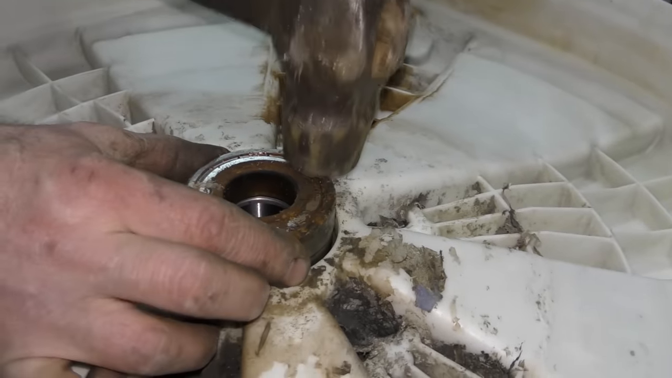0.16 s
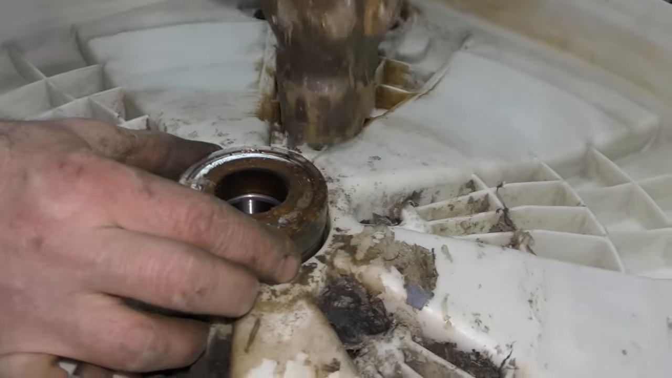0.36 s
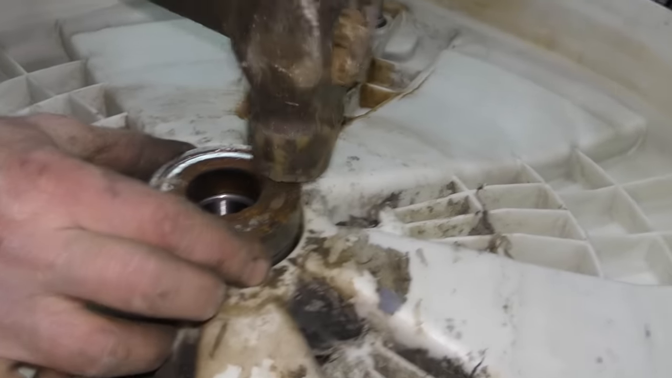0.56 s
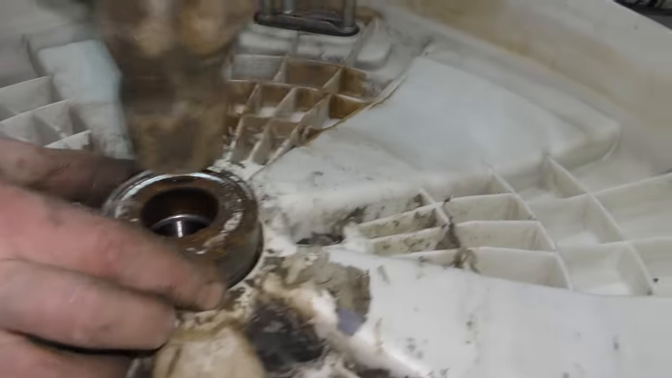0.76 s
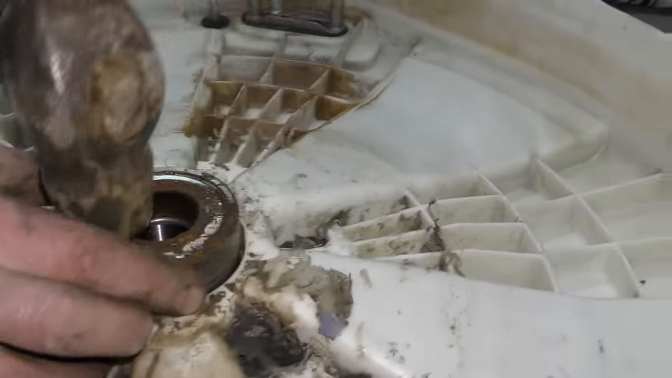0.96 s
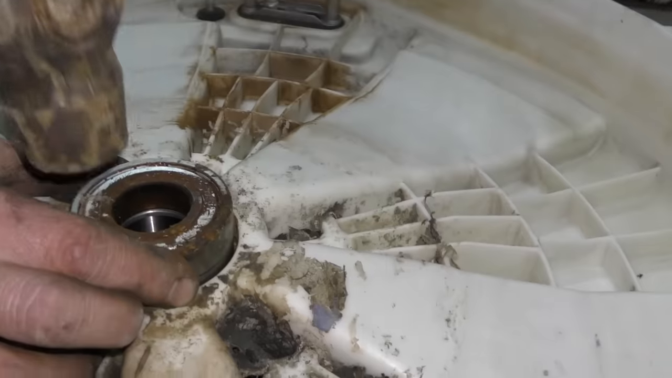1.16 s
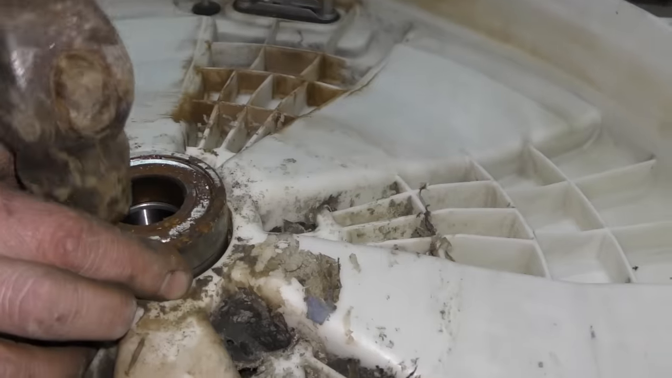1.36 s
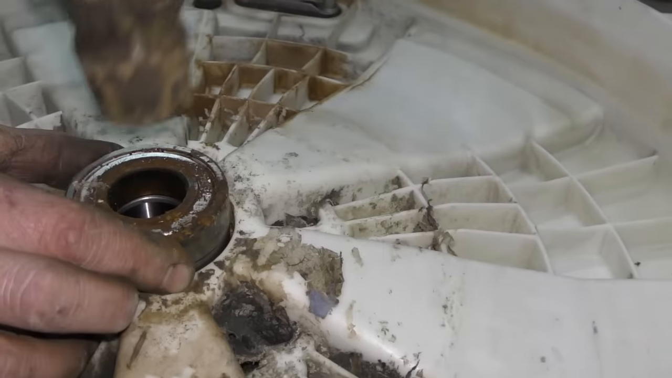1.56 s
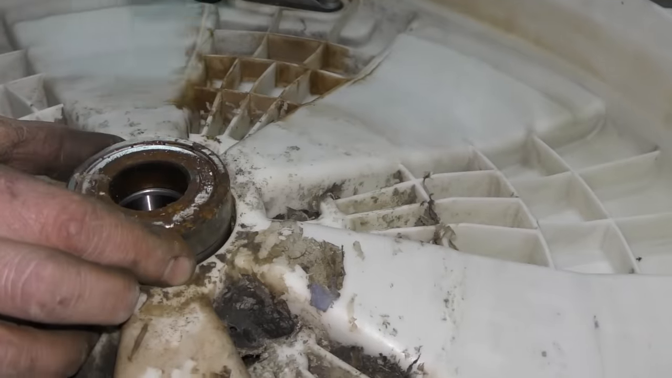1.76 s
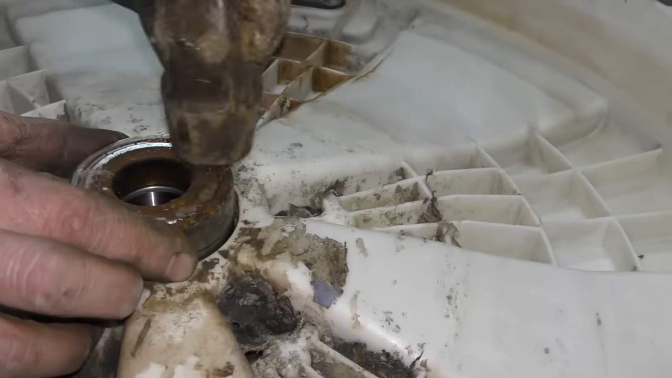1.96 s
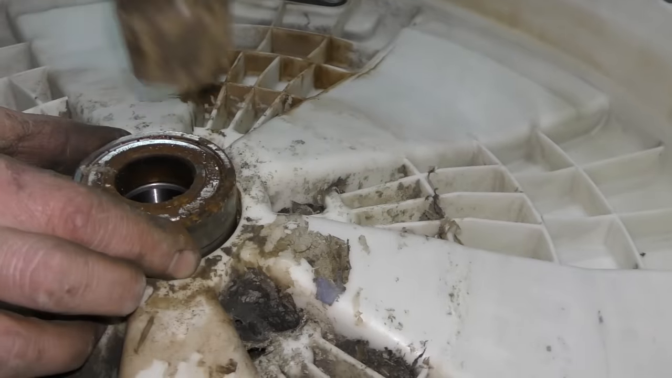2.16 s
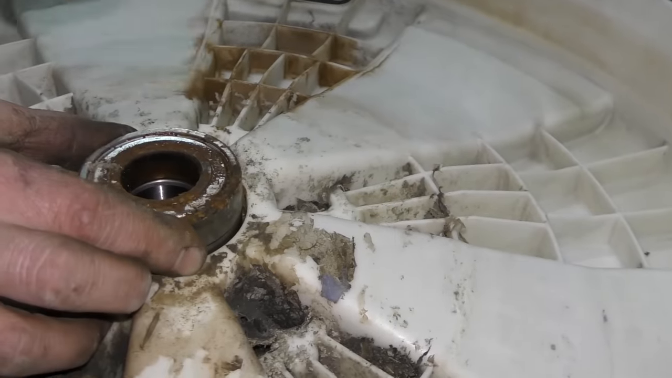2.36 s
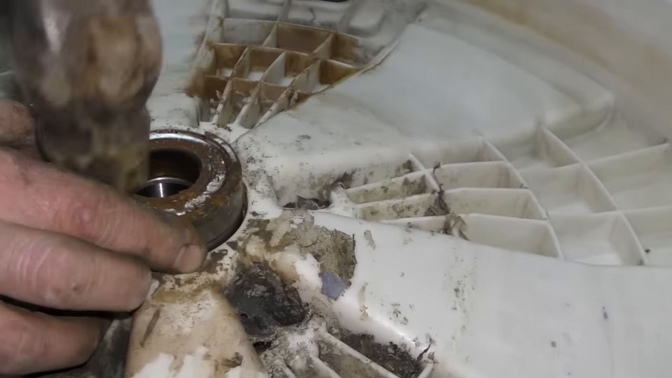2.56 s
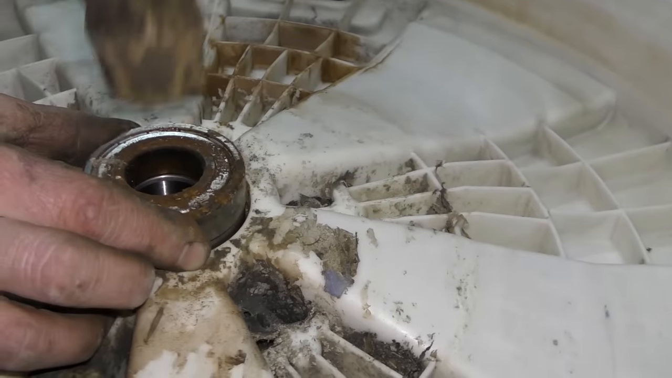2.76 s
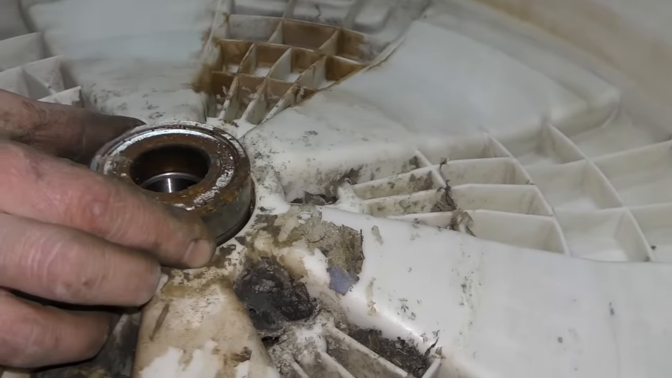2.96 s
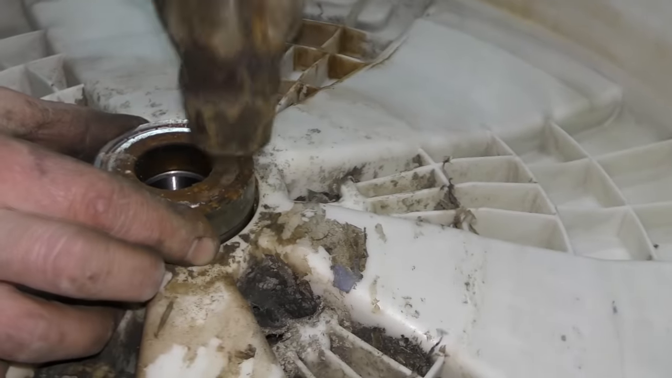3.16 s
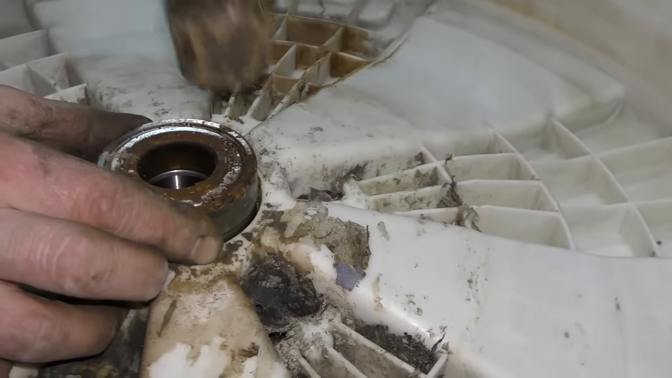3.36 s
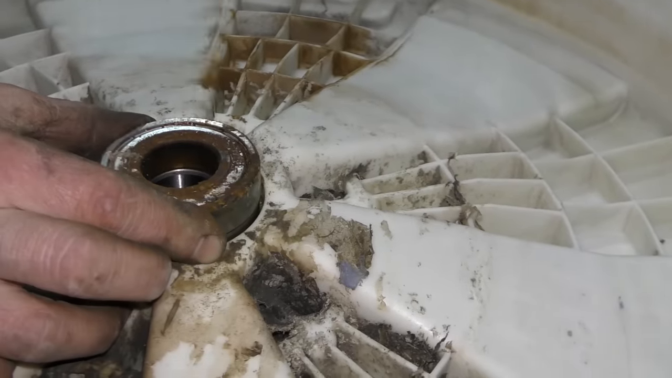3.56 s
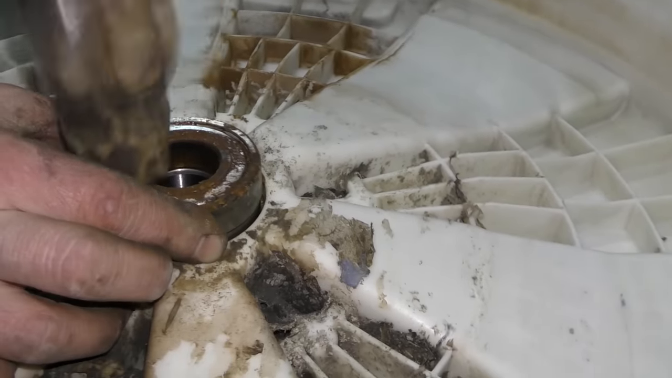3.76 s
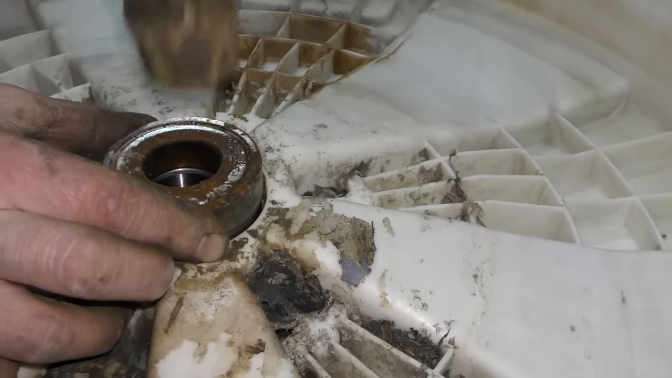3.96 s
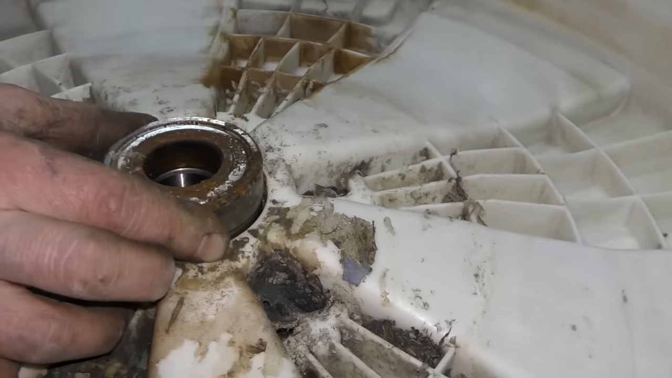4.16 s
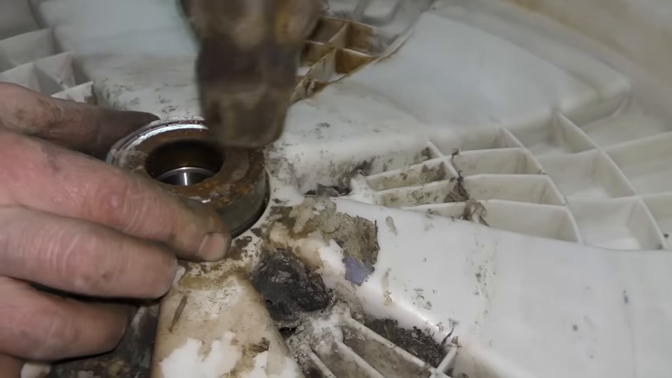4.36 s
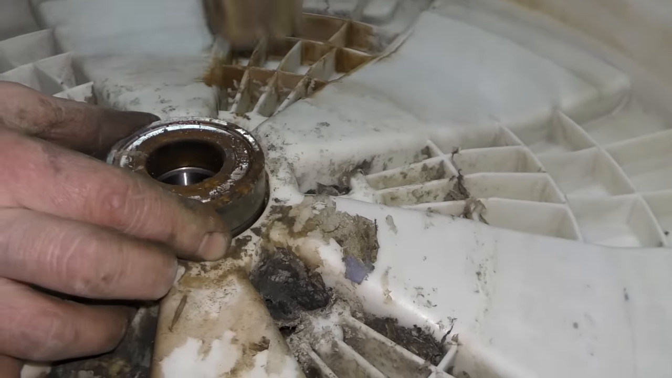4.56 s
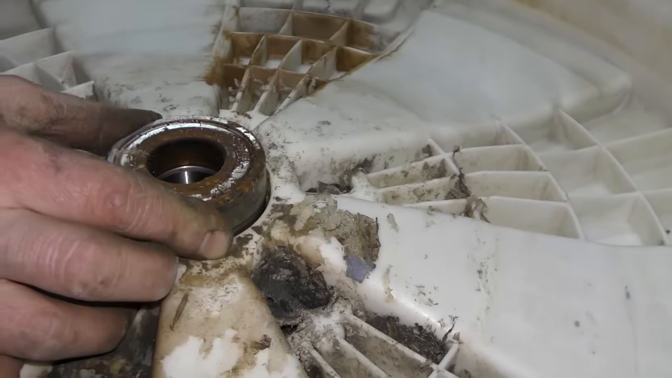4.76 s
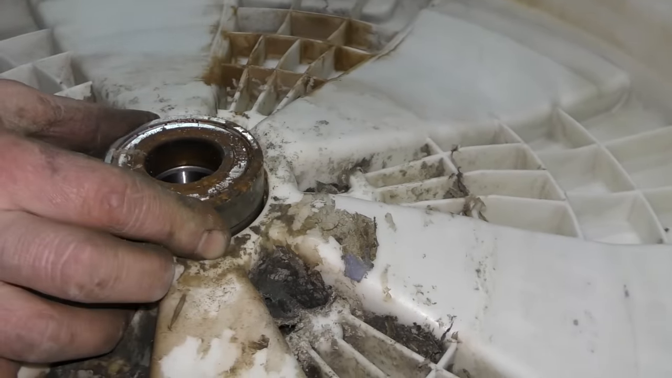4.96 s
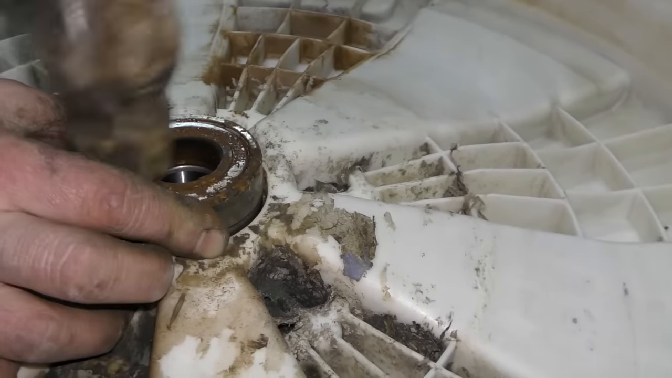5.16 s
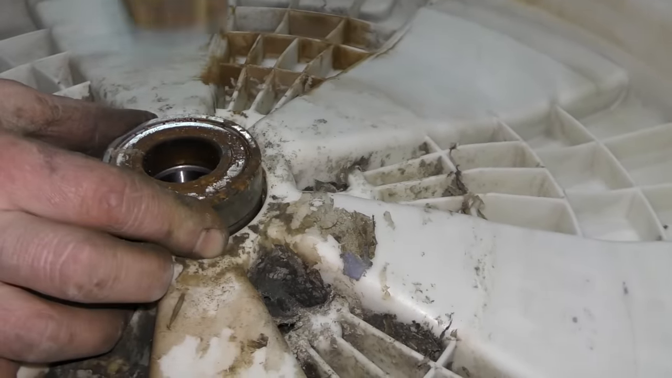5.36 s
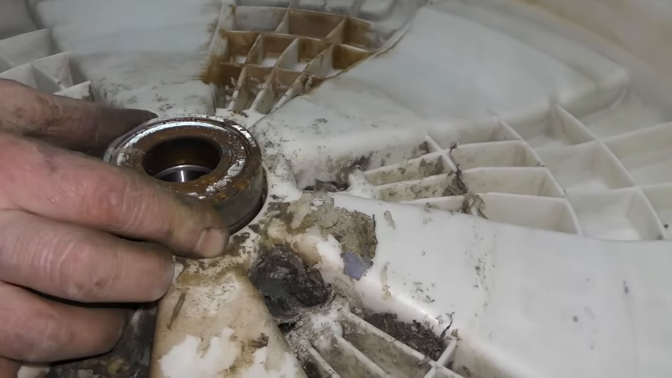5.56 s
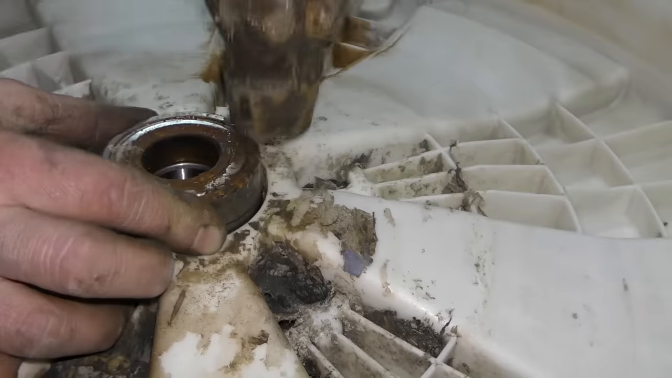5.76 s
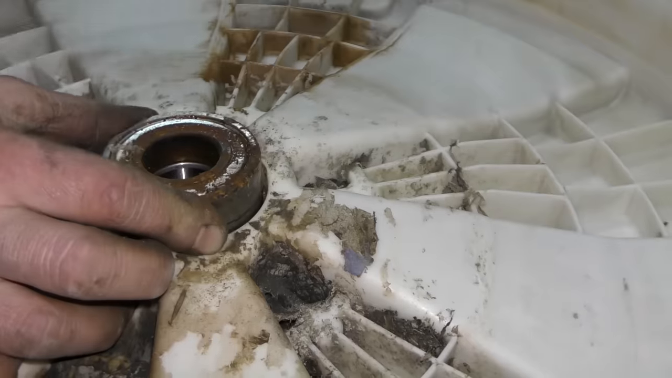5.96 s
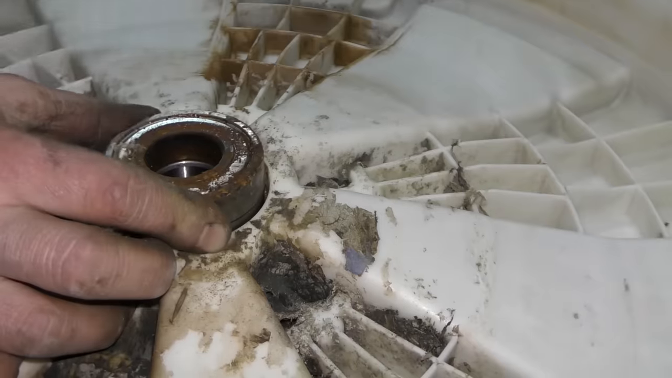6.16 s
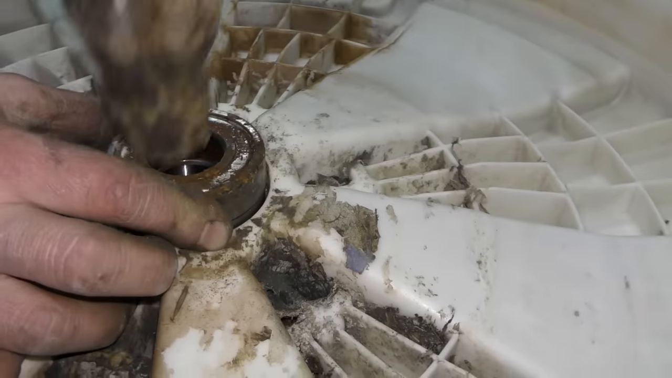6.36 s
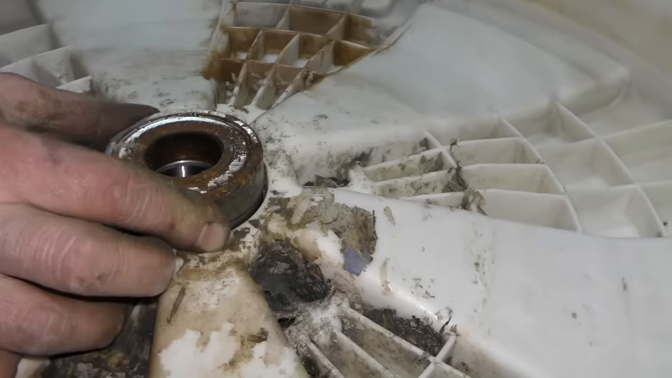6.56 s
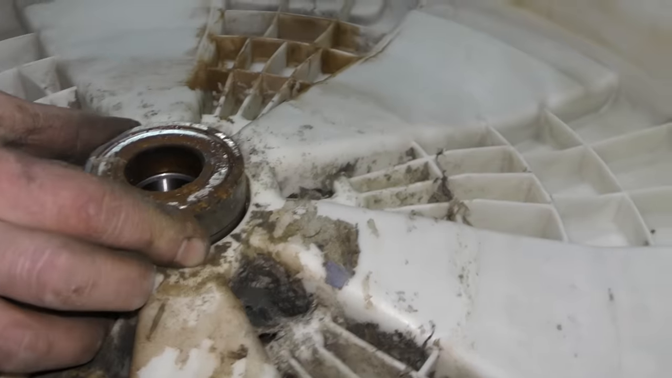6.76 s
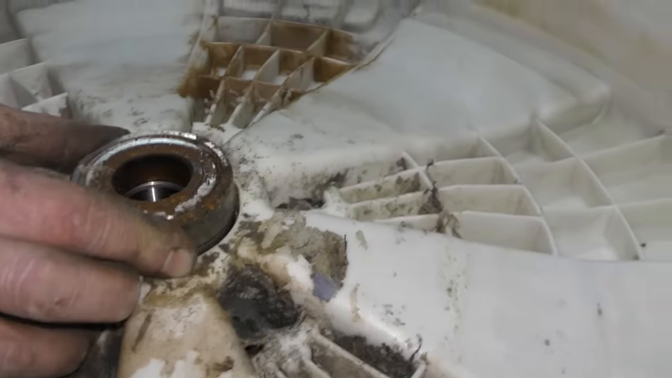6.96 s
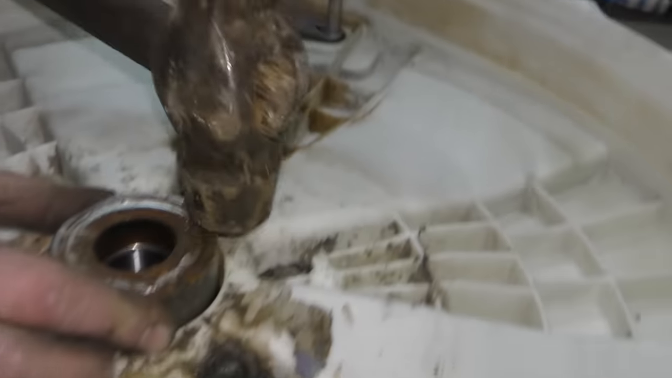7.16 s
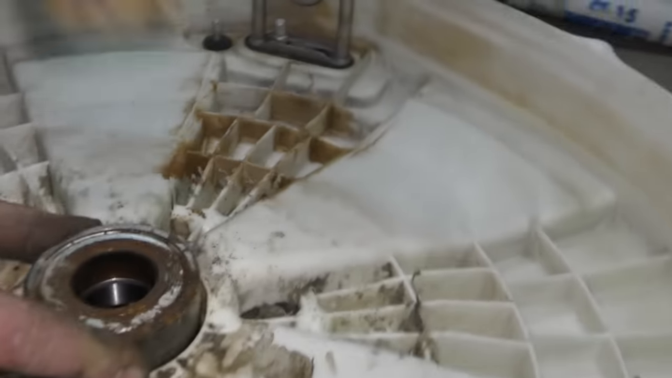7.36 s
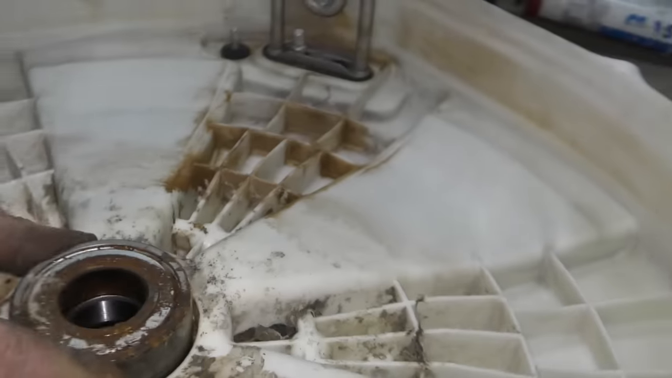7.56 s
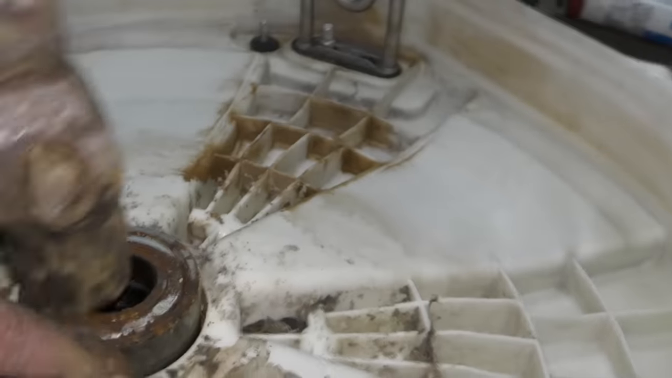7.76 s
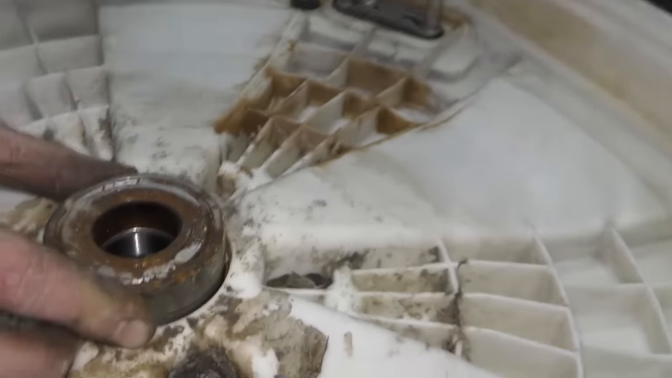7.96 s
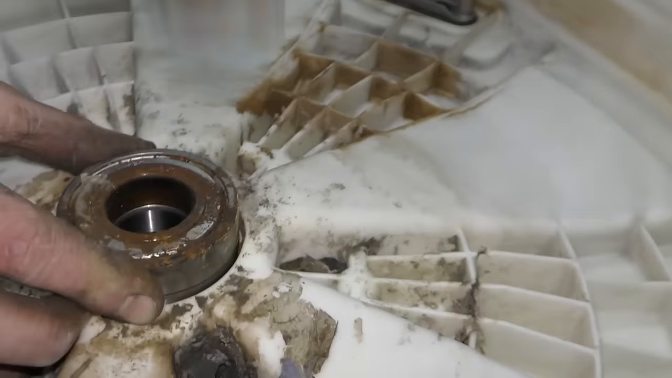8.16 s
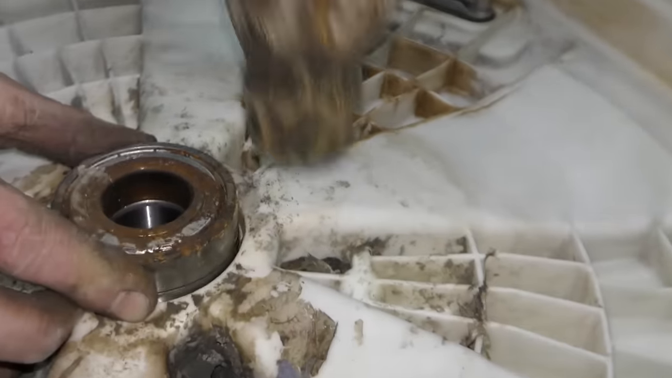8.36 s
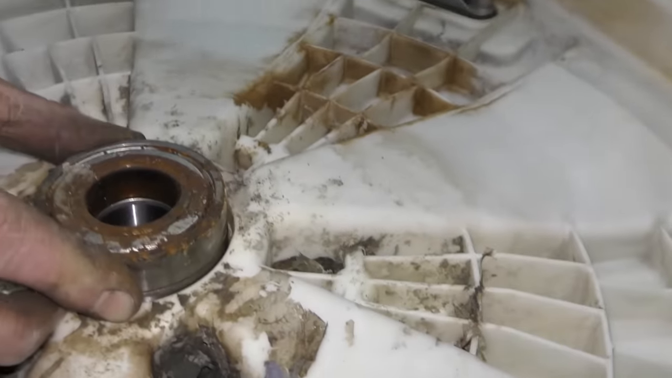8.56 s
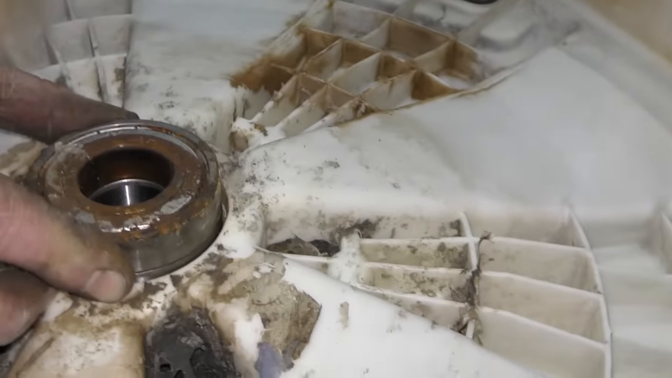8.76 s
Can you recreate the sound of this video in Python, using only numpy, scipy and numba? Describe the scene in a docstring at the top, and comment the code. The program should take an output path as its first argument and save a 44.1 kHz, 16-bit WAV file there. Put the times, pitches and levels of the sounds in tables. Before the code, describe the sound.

A phone close to the work in an echoing workshop picks up a steel hammer driving a bearing into a plastic washer tub. A faint tail of an earlier sound fades at the start. A soft, boomy tap falls at 0.2 seconds, a sharper one at 0.5, then a pause. Firmer blows follow at 1.3, 1.9, 2.6, 3.2, 3.8 and 4.4, then 5.2, 5.7, 6.3, 7.1, 7.7 and 8.2, growing to full strength. Each is a bright double click with gritty rattle, a short hollow tub knock and hub ring, a faint long drum hum and about half a second of echo with a slap from a far wall. Gain ducks, then creeps back, holding up the echo. A distant scuff with trailing hiss comes at 2.3. Fingers tick and slide around 7.0, 7.6 and 8.1. Low hum, muffled room noise and thin hiss continue until about 9.

```python
"""Hammering a bearing into a tub

A steel hammer taps a bearing into the hub of a plastic washer tub, close to a phone in a workshop. Each blow is
clicks and rattle, fading tones of the tub, a long drum hum and room echo. Gain control ducks at the blow and creeps
back, holding the echo up for a moment. Fingers tick and slide, something scuffs farther off with a trailing hiss,
the tail of something earlier fades at the start, and under it all lie a low hum, filtered room noise and
microphone hiss."""
import sys
import numpy as np
from scipy import signal
from scipy.fft import rfft, irfft
from scipy.io import wavfile
from scipy.ndimage import uniform_filter1d
from numba import njit

SR = 44100
rng = np.random.default_rng(int(sys.argv[2]) if len(sys.argv) > 2 else 0)


def waveform_to_disk(signal):
    """Save audio, clipped to [-1, 1], as 16-bit WAV at the path in sys.argv[1]."""
    frames = np.transpose(np.atleast_2d(signal))
    scaled = np.clip(frames, -1, 1) * 32767
    samples = np.round(scaled).astype(np.int16)
    wavfile.write(sys.argv[1], SR, samples)


N = 388521  # length in samples

# Half a step to the left port and half a step back to the right one.
PORTS = np.array(np.array([[.5], [-.5]]))

# The hammer blows. Each row: start in seconds, strength in dB, then levels in dB against the strength of: the crack,
# the tub's thud, its boom, its rim, its ribs, three hub rings from low to high, three bearing rings from low to high,
# the crack sent to the walls; then treble tilt in dB per octave, delay of the second click in milliseconds,
# second click in dB against the first, chatter in dB.
BLOWS = [(0.1986, -11.5, -0.5, -3, 13, 8.5, -16, -3.5, -1.5, 5.5, -6, -6, -20, 4, -10.5, 0.51, 1.5, -15.5),
         (0.5073, -0.5, -13, -9, 7.5, 1, -24, -3.5, -23, -20, -8, -4, 11, -1, -0.5, 0.92, 11, -1.5),
         (1.3032, 3.5, 0.5, -2, 4.5, -2.5, -1.5, -7, -2.5, -26, -11, -9, -12, -3, -6, 0.93, -19, -16),
         (1.9421, 3.5, 2.5, -1, 10.5, -6, -4, -2, 2, 5.5, -4, 1.5, 8, 7, -3, 0.86, -31, -8),
         (2.5782, 6, -8.5, 0, 5, -1, -7, -6.5, -2, -20, -8, 0, 6, -3.5, 0, 0.8, -7, 1.5),
         (3.1795, 7.5, 3, -4, 2, 1, -22, -6, -6, 1, -10, -1.5, -11, -0.5, -1, 0.94, 3, -9),
         (3.7832, 8.5, -1.5, -4, 1.5, -2, -1, -5.5, -9, 3, -6, -2.5, 4, -3.5, -2, 0.76, -1, -5),
         (4.3752, 10.5, -4, -2, 1, 1.5, 1, -8, -6.5, 1.5, -2.5, -3, -17, -5, 0, 0.66, -1, -6.5),
         (5.1719, 9, 0, 1, 4.5, 0.5, 4, 2.5, -0.5, 6, 3, -2, -6, -0.5, -1.5, 0.67, 0, -9.5),
         (5.699, 11, -3.5, -4, -2, 1.5, 3, -1.6, -9, 0.5, 2, -4.5, -18, -4.5, -0.5, 0.685, 1, -16),
         (6.2798, 11, 2, 1.5, 0.2, -3, 4.5, -1.5, 5.5, 10.5, 0, 2, -14, -5, -2.5, 1.03, -9, -2),
         (7.1096, 11, -9.5, -1, 0.5, 4.5, 4, 0, 0, 2.5, 3.5, -2.5, -15.5, -5, 2.5, 0.78, -1.5, -9),
         (7.6894, 11, 2, 0.5, 1, 2.5, 6, 3.5, 3.5, 11.5, 1, 4, -12, -2.5, -1, 1.1, -9, 0),
         (8.2283, 11.5, -3, -2.5, -1.5, 2.5, 4.5, 1, -1, 5.5, 3.5, 0, -24, -6.5, 4, 1.27, -2, -4.5)]
# The first tap also rocks the tub on its bench. One row: pitch in Hz, level in dB, time to fall 60 dB in seconds.
BENCH = (104, -22, 0.24)
BENCH_S = 0.205


def hammer(crack_db=0.5, echo_db=-3.5, echo_db_per_db=0.3364):
    """Every blow heard close by, as the walls get it, and as drum hum: impacts set many parts ringing."""
    near, far = np.zeros((2, N)), np.zeros(N)
    for (s, strength_db, bite_db, thud_db, boom_db, *rings_db,
         walls_db, tilt_db, part_ms, part_db, chatter_db) in BLOWS:
        modes, scatter_db = tub(s, thud_db, boom_db, rings_db)
        add(near, undb(strength_db) * flutter(modes).sum(axis=1), s)
        click = crack(tilt_db, part_ms, part_db, chatter_db)
        add(near, undb(strength_db + bite_db + crack_db) * click, s)
        # harder blows fill the room more than in proportion
        far_db = (1 + echo_db_per_db) * strength_db + echo_db
        add(far, undb(far_db) * blow_at_walls(modes[0], scatter_db, walls_db, tilt_db), s)
    t = np.arange(2 * SR) / SR
    add(near, np.minimum(t / .01, 1) * ring(*BENCH, t), BENCH_S)
    return near, far, drum_hum()


# Ringing of tub, hub and bearing. Each row: pitch in Hz, relative level in dB, time to fall 60 dB in seconds.
MODES_OF_TUB = [(70, -9, 0.075), (106, -9, 0.072), (153.7, -7.5, 0.059), (218.6, -5.5, 0.055),
                (265.7, -15.5, 0.2), (307, -2.5, 0.043), (366, -1.5, 0.053), (405.4, -1, 0.091),
                (480.2, -6, 0.091), (733, -19, 0.12), (1000, -5, 0.065), (1097, -7.5, 0.087),
                (1408, -4, 0.069), (1583, -12.5, 0.088), (1870, -13, 0.041), (2075, -24, 0.032),
                (2500, -11.5, 0.071), (3080, -16.5, 0.08), (3720, -12, 0.032), (4390, -16.5, 0.065),
                (5140, -18.5, 0.057), (6230, -23.5, 0.042), (6980, -26, 0.02), (7590, -21.5, 0.035)]
MODE_HZ, MODE_DB, MODE_T60 = np.array(MODES_OF_TUB)[:, :3].T[:, :, None]
# top Hz of each part but the last: thud, boom, body, rim, ribs, three of the hub, two of the bearing
PART_OF_MODE = np.searchsorted([130, 240, 440, 600, 850, 1250, 1500, 2100, 3400, 5800], MODE_HZ[:, 0])
# How far the left port leads the right. Each row: frequency in Hz, lead in radians.
PORT_PHASE = [(40, 1.5), (90, 1), (160, 0.3), (260, 0.67), (600, -0.37), (1210, -0.63), (2330, -0.5),
              (4130, 0.89), (8000, -0.11), (15000, 0.5)]
LOW_RING = 10  # index of the hub's low ring, counted from 0
SEATED_PITCH, LOOSE_PITCH, SEAT_S = 0.97, 0.131, 3.3  # final pitch factor, extra at first, sinking time (s)
GATHER_S, GATHER_SPREAD = .0038, 0.68  # modes swing together this long after contact (s), give or take (radians)


def tub(s, thud_db, boom_db, rings_db, push_s=0.0017, scatter_db=2.0, detune=0.0186, tub_db=-1.0, body_db=2):
    """Decaying tones of the parts; each blow lands elsewhere and stirs them in a slightly new mix."""
    t = np.arange(SR // 5) / SR
    level_mix, pitch_mix, phase_mix = rng.standard_normal((3, len(MODE_HZ), 1))
    part_db = np.array([thud_db, boom_db, body_db, *rings_db])[PART_OF_MODE, None]
    scatter_db = scatter_db * level_mix
    level_db = tub_db + MODE_DB + part_db + scatter_db
    # the hub's low ring starts sharp and sinks as the bearing seats
    sinking = SEATED_PITCH + LOOSE_PITCH * np.exp(-(s / SEAT_S) ** 2)
    seat = np.where(np.arange(len(MODE_HZ))[:, None] == LOW_RING, sinking, 1)
    lead = PORTS[:, :, None] * along(PORT_PHASE, MODE_HZ)
    phase = lead + np.pi / 2 - 2 * np.pi * MODE_HZ * GATHER_S + GATHER_SPREAD * phase_mix
    swell = np.minimum(t / push_s, 1)  # the tub starts to move while the head still pushes
    modes = swell * ring(MODE_HZ * seat * (1 + detune * pitch_mix), level_db, MODE_T60, t, phase)
    return modes, scatter_db


def flutter(modes, above_hz=1300, share=.95, span_s=.0013):
    """The unseated bearing makes the upper modes flutter: smoothed noise scales their level."""
    span = int(span_s * SR)
    wobble = np.sqrt(span) * uniform_filter1d(rng.standard_normal(modes.shape[1:]), span)
    loose = share / (1 + (above_hz / MODE_HZ) ** 4)
    return modes * (np.sqrt(1 - loose ** 2) + loose * wobble)


# Colour of the close crack. Each row: frequency in Hz, relative level in dB.
CRACK = [(600, -2.5), (1500, 6), (3000, 2), (5500, -7), (8000, -7.5), (11000, -3.5), (15000, -11.5),
         (17000, -17.5)]


def crack(tilt_db, part_ms, part_db, chatter_db, first_db=15, tail_db=-15, tail_tilt_db=5.0, spiky=2.87,
          unlike=0.23, pan_db=1.0, after_s=0.00055, edge_db=2.5):
    """Steel clicks on steel as the head lands and leaves again, chatter around, then a thinner rattle dies away."""
    t = np.arange(SR // 12) / SR
    chatter_s, tail_t60 = part_ms / 1000 + after_s, .06
    hz = np.fft.rfftfreq(SR // 50, 1 / SR)
    gain = undb(along(CRACK, hz)) * tilt(hz, tilt_db)
    shared, side = rng.standard_normal((2, len(t)))
    chance = shared + unlike * side * 2 * PORTS
    # a power above 1 leaves a few strong spikes
    spikes = np.sign(chance) * np.abs(chance) ** spiky
    chatter = spikes * undb(chatter_db + pan_db * PORTS) * (t < chatter_s)
    second = np.maximum(1 - np.abs(t - part_ms / 1000) * SR, 0)
    clicks = undb(first_db + pan_db * PORTS) * ((t == 0) - undb(part_db) * second)
    rattle = chance * undb(tail_db - 60 * t / tail_t60)
    return (signal.fftconvolve(chatter, [causal(gain)], axes=1)
            + signal.fftconvolve(clicks, [causal(gain * tilt(hz, edge_db))], axes=1)
            + signal.fftconvolve(rattle, [causal(gain * tilt(hz, tail_tilt_db))], axes=1))


# Colour of the crack as the walls get it. Each row: frequency in Hz, relative level in dB.
WALL_CRACK = [(400, -2), (750, -5), (1100, -0.5), (1600, 3), (2300, 3), (3400, 2), (5500, -7.5),
              (8000, -8.5), (11000, -4), (15000, -10.5), (17000, -25)]
WALL_TILT_SHARE, WALL_TILT_DB = 0.92, 1.5  # share of the blow's tilt, extra brightness (dB per octave)


def blow_at_walls(modes, scatter_db, walls_db, tilt_db, far_crack_db=20.0, blur=0.075, even=0.61):
    """Over all directions neighbouring modes add as power, without the gaps of any one direction."""
    hz = np.fft.rfftfreq(modes.shape[-1], 1 / SR)
    evened = modes * undb(-even * scatter_db)
    body_power = smear((np.abs(rfft(evened)) ** 2).sum(axis=0), blur)
    click = undb(along(WALL_CRACK, hz)) * tilt(hz, WALL_TILT_SHARE * tilt_db + WALL_TILT_DB)
    click_power = (undb(walls_db + far_crack_db) * click) ** 2
    return causal(np.sqrt(body_power + click_power))


def smear(power, share):
    """Mean over a band of plus and minus this share around each frequency."""
    total, k = np.cumsum(power), np.arange(len(power))
    low, high = k * (1 - share), k * (1 + share) + 1
    return (np.interp(high, k, total) - np.interp(low, k, total)) / (high - low)


# Long hum of the steel drum inside. Each row: pitch in Hz, level in dB against the blow's strength,
# time to fall 60 dB in seconds.
DRUM = [(213, -69, 3.2), (204.7, -56.5, 4.1), (221.3, -50.5, 4.2), (222.4, -55, 3.9), (253, -50.5, 3.2),
        (168, -53.5, 1.85)]


def drum_hum():
    """Each blow starts the drum's slow tones again, each pushed up or down at random."""
    drum, t = np.zeros((2, N)), np.arange(2 * SR) / SR
    hums = np.array([ring(*mode, t) for mode in DRUM]) * np.minimum(t / 0.021, 1)
    for s, strength_db, *_ in BLOWS:
        signs = np.sign(rng.standard_normal(len(DRUM)))
        add(drum, undb(strength_db) * signs @ hums, s)
    return drum


# Small ticks at the grip. Each row: start in seconds, level in dB, centre in Hz, treble in dB against the centre.
TICKS = [(6.9522, -43, 7600, -7), (6.9575, -40.5, 7800, -10), (6.9714, -18.5, 2620, -15.5),
         (7.0754, -32, 2500, -13), (7.618, -47, 5000, -14), (7.628, -41, 2800, -30),
         (7.638, -46, 6000, -21), (7.992, -42, 6020, -25), (8.123, -55, 4230, -4), (8.158, -55, 4500, -8),
         (8.191, -47, 5900, -20), (8.2, -52, 5900, -25)]
# Corners of a tick's colour. Each value: a multiple of its centre frequency.
TICK_STEPS = np.array(np.array([.3, .65, 1, 1.15, 1.45]))


def finger_ticks():
    """Very short coloured noise bursts, as fingers tick at the grip."""
    out, t = np.zeros(N), np.arange(SR // 40) / SR
    for s, db, hz, treble_db in TICKS:
        burst = rng.standard_normal(len(t)) * undb(db - 60 * np.maximum(t - 0.003, 0) / 0.014)
        burst = np.roll(burst, SR // 500)  # 2 ms of room for the filter's early ringing
        peak = zip(hz * TICK_STEPS, [-22, -7, 0, -3, treble_db - 4.0])
        add(out, colour(burst, [*peak, (14000, treble_db), (16500, treble_db - 26)]), s - 1 / 500)
    return out


# Finger slides and other soft hisses: the tail of something earlier at the start, the scuff's trailing hiss
# at 2.288. Each row: start in seconds, attack in seconds, length after it in seconds, level in dB,
# treble tilt in dB per octave.
SOFT_HISSES = [(-.06, 0.018, 0.077, -48.5, -1.5), (0.45, 0.006, 0.07, -53, -1),
               (2.288, 0.011, 0.43, -46, -5), (6.987, 0.006, 0.11, -42.5, 0),
               (7.514, 0.018, 0.067, -39, -5.5), (7.629, 0.018, 0.074, -50, -1),
               (8.07, 0.018, 0.26, -61, 3)]
# Colour of these hisses. Each row: frequency in Hz, relative level in dB.
SOFT_COLOUR = [(800, -4.5), (3000, -2), (5500, -5.5), (8000, -5.5), (9000, -6), (10200, -5), (11300, -10),
               (12600, -2), (14000, -14.5), (15300, -4), (16300, -32)]


def slides_and_soft_hisses(uneven_db=1.5, uneven_s=0.0045, release_s=0.064):
    """Coloured noise swells and fades at an uneven level: rubbing fingers, and hiss trailing other sounds."""
    out, hz = np.zeros(N), np.fft.rfftfreq(N, 1 / SR)
    noise, span = rfft(colour(rng.standard_normal(N), SOFT_COLOUR)), int(uneven_s * SR)
    uneven = undb(uneven_db * np.sqrt(span) * uniform_filter1d(rng.standard_normal(N), span))
    for s, attack, length, db, tilt_db in SOFT_HISSES:
        corners = s + np.cumsum([0, attack, length, release_s])
        # squaring turns the -3 dB into a fade of 6 dB over the length
        swell = np.interp(np.arange(N) / SR, corners, [0, 1, undb(-3), 0]) ** 2
        out += undb(db) * swell * uneven * irfft(noise * tilt(hz, tilt_db), N)
    return out


# Scuff sent through the room. Each row: frequency in Hz, relative level in dB.
SCUFF = [(900, -19), (1400, 12), (1800, 11), (2200, 6), (2550, 6), (3000, -9), (4200, -7), (5300, -1),
         (6500, -6), (7400, -18), (12000, -20)]
# Scuff heard straight. Each row: frequency in Hz, relative level in dB.
SCUFF_DIRECT = [(1200, -40), (2400, -23), (3200, -32), (4300, -30), (5200, -11), (6000, -21), (6700, -20),
                (7500, -32), (12000, -36)]


def scuff(start_s=2.302, level_db=-25.5, length_s=0.045):
    """Something scrapes briefly farther off: a noise burst, as the room gets it and as heard straight."""
    out, burst = np.zeros((2, N)), rng.standard_normal(SR // 10)
    # past the last corner the level stays at 0.24 until the burst ends
    burst *= np.interp(np.arange(len(burst)) / SR / length_s, [0, .12, .8, 1], [0, 1.0, 0.45, 0.24])
    add(out, undb(level_db) * np.array([colour(burst, SCUFF), colour(burst, SCUFF_DIRECT)]), start_s)
    return out


# The workshop's echo. Each row: frequency in Hz, relative level in dB, time to fall 60 dB in seconds,
# share unlike at left and right from 0 to 1.
ROOM = [(60.4, -27, 0.96, 0.41), (128.6, -8, 0.88, 0.3), (200, -2.5, 0.72, 0.16), (301, 3, 0.82, 0.22),
        (402, -0.5, 0.59, 0.32), (505, 3.5, 0.62, 0.38), (677, 4, 0.7, 0.25), (800, 3.5, 0.74, 0.3),
        (970, 4, 0.69, 0.3), (1370, 4.5, 0.71, 0.44), (2140, -1, 0.63, 0.73), (4230, 2.5, 0.55, 0.17),
        (7000, 6, 0.44, 0), (10250, 1.5, 0.31, 0.1), (12050, 0, 0.29, 0.28), (15000, -16, 0.19, 0.92)]
# Low boom of the shop. Each row: pitch in Hz, relative level in dB, time to fall 60 dB in seconds.
SHOP_MODES = [(222, -7, 0.62), (269, -6.5, 0.67), (315.6, 4.1, 0.44), (362, 3.8, 0.56), (399, -1.5, 0.55),
              (502, -7, 0.67)]
# A far wall slaps back. Each row: frequency in Hz, level in dB against the echo at that moment.
SLAP = [(150, -21), (350, -2.5), (1300, -14.5), (4000, -8), (9000, -23)]
SLAP_S, SLAP_WIDTH_S = 0.2427, 0.024  # delay and spread in seconds
ROOM_DB, LATE_DB, LATE_STRETCH = -13.5, -41, 7.1  # echo level, far part against it, its longer decay (times)


def room(x, first_s=0.0056, boom_db=-22):
    """Noise bands die at their own rates; low modes boom, a wall slaps back, a weak far part rings longer."""
    t = np.arange(2 * SR) / SR
    hz = np.fft.rfftfreq(len(t), 1 / SR)
    noise, echo = rfft(rng.standard_normal((2, len(t)))), 0
    slap = np.exp(-((t - SLAP_S) / SLAP_WIDTH_S) ** 2)
    for mid_hz in 40 * 2 ** np.arange(0, 9, 1 / 3):  # third-octave steps
        band = np.cos(np.pi / 2 * np.clip(3 * np.log2((hz + 1) / mid_hz), -1, 1)) ** 2
        t60, unlike = along(ROOM, mid_hz, axis=2), np.clip(along(ROOM, mid_hz, axis=3), 0, 1)
        mid, side = irfft(noise * band)
        fade = undb(-60 * t / t60) + undb(LATE_DB - 60 * t / (LATE_STRETCH * t60))
        fade = fade * (1 + undb(along(SLAP, mid_hz)) * slap)
        echo = echo + undb(along(ROOM, mid_hz)) * fade * np.array([mid + unlike * side, mid - unlike * side])
    for mode_hz, db, t60 in SHOP_MODES:
        boom = ring(mode_hz, db + boom_db, t60, t, rng.uniform(0, 2 * np.pi))
        echo = echo + boom * (1 + undb(along(SLAP, mode_hz)) * slap)
    arrival = np.clip(t / first_s - 1, 0, 1)  # silent until the first echo, full at twice that delay
    echo = echo * arrival * undb(ROOM_DB) / np.sqrt(SR / 20)
    return signal.fftconvolve(x[None], echo, axes=1)[:, :N]


# Colour of the steady shop noise. Each row: frequency in Hz, relative level in dB per Hz.
AIR = [(18, -67), (30, -5), (68, -2), (102, 5), (126, -4), (214, -1), (585, -18.5), (1230, -6),
       (2520, -13.5), (3550, -15.5), (5580, -32.5), (10500, -24.5), (15300, -23.5), (16300, -47)]


def air(air_db=-58, unlike=0.52, hum_hz=92.5, hum_db=-69.5):
    """Steady shop noise, partly different at left and right, and one low hum tone."""
    mid, side = colour(rng.standard_normal((2, N)), AIR)
    hum = undb(hum_db) * np.sin(2 * np.pi * hum_hz * np.arange(N) / SR)
    return undb(air_db) / mid.std() * np.array([mid + unlike * side, mid - unlike * side]) + hum


def scene():
    """Blows, ticks and soft hisses close by, then drum hum, scuff, the room's answer and its air."""
    near, far, drum = hammer()
    scrape, direct = scuff()
    lasting = drum + direct + room(far + scrape) + air()
    return near + finger_ticks() + slides_and_soft_hisses() + shift(lasting)


def shift(x):
    """The phase lead between the two ports, for lasting sounds."""
    lead = PORTS * along(PORT_PHASE, np.fft.rfftfreq(N, 1 / SR))
    return irfft(rfft(x) * np.exp(1j * lead), N)


def undb(db):
    """Turn dB into a plain factor."""
    return 10 ** (np.asarray(db) / 20)


def along(table, hz, axis=1):
    """A table column read on a log-frequency axis."""
    table = np.array(table, float)
    return np.interp(np.log(hz + 1), np.log(table[:, 0] + 1), table[:, axis])


def colour(x, table):
    """Shape the last axis by (Hz, dB) points."""
    hz = np.fft.rfftfreq(x.shape[-1], 1 / SR)
    return irfft(rfft(x) * undb(along(table, hz)), x.shape[-1])


def tilt(hz, db_per_octave, from_hz=2500):
    """Gain that leans the treble."""
    return undb(db_per_octave * np.log2(np.maximum(hz / from_hz, 1)))


def causal(gain):
    """The shortest response with this gain that starts at zero (folded cepstrum)."""
    c = irfft(np.log(gain + 1e-9))
    fold = np.concatenate([c[:1], 2 * c[1:len(c) // 2], np.zeros(len(c) - len(c) // 2)])
    return irfft(np.exp(rfft(fold)))


def ring(hz, db, t60, t, phase=0):
    """One decaying mode: a sine that falls 60 dB in t60 seconds."""
    return undb(db - 60 * t / t60) * np.sin(2 * np.pi * hz * t + phase)


def add(track, sound, s):
    """Mix a sound in at s seconds."""
    i = int(s * SR)
    track[..., i:i + sound.shape[-1]] += sound[..., :N - i]


@njit
def duck(over_db, attack, release_db, quicken_db):
    """Gain cut in dB: follows peaks fast, then lets go at a rate that grows while no new peak comes."""
    cut, c, step = np.empty(len(over_db)), 0., 0.
    for i in range(len(over_db)):
        if over_db[i] > c:
            c, step = c + attack * (over_db[i] - c), release_db
        else:
            c, step = max(c - step, 0.), step + quicken_db
        cut[i] = c
    return cut


# Balance of the two ports. Each row: frequency in Hz, left minus right in dB.
PORT_DB = [(60, 4), (110, -4.5), (200, 0), (380, 1.5), (700, 1.5), (1290, 0.0), (2380, -1), (4400, 1),
           (8120, -0.5), (15000, 2)]
TOP_HZ, HISS_DB = 16900, -73.5  # highest frequency kept, hiss level before its colour


def record(dry, knee_db=-19.0, slope=0.69, attack_s=0.00089, release_db_per_s=73.0, quicken_db_per_s2=200.0,
           ahead_s=0.0016, ceiling=1.02):
    """Two ports with their own level, gain control that looks slightly ahead, soft ceiling, thin hiss, cut top."""
    half = undb(along(PORT_DB, np.fft.rfftfreq(SR // 10, 1 / SR)) / 2)
    ports = signal.fftconvolve(dry, [causal(half), causal(1 / half)], axes=1)[:, :N]
    peak_db = 20 * np.log10(np.abs(ports).max(axis=0) + 1 / SR)
    over_db = slope * (peak_db - knee_db)
    cut_db = duck(over_db, 1 / (attack_s * SR + 1), release_db_per_s / SR, quicken_db_per_s2 / SR ** 2)
    ducked = ports * undb(-np.roll(cut_db, -int(ahead_s * SR)))
    held = ceiling * np.tanh(ducked / ceiling)
    # the hiss comes after the gain control, so it stays steady
    held = held + undb(HISS_DB) * colour(rng.standard_normal(N), [(15300, -1), (16300, -30.5)])
    return signal.sosfilt(signal.ellip(10, .2, 95, TOP_HZ, fs=SR, output="sos"), held)


dry = scene()
out = record(dry)
waveform_to_disk(out)
```